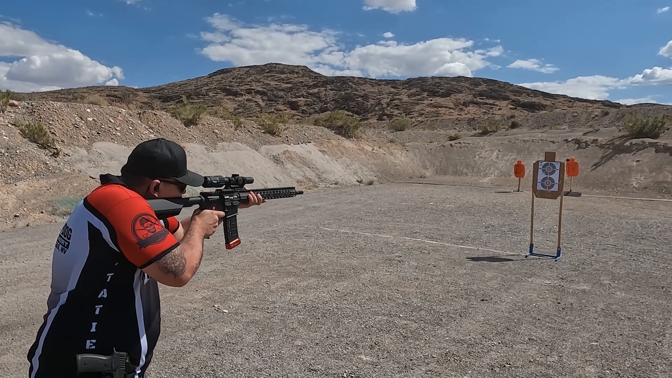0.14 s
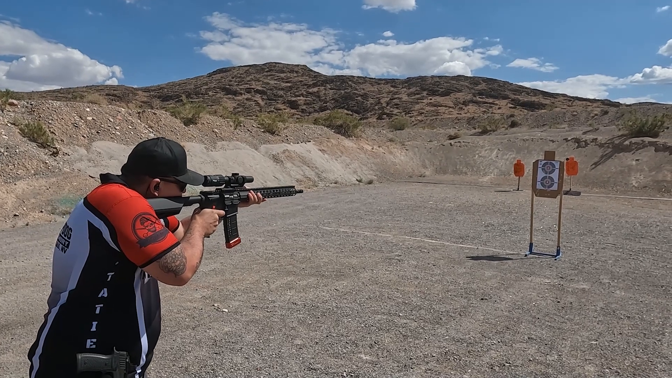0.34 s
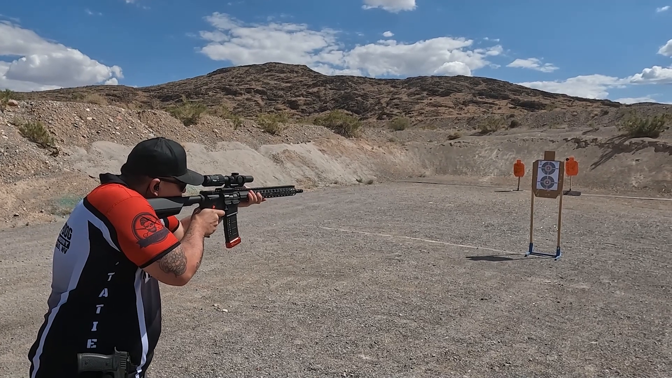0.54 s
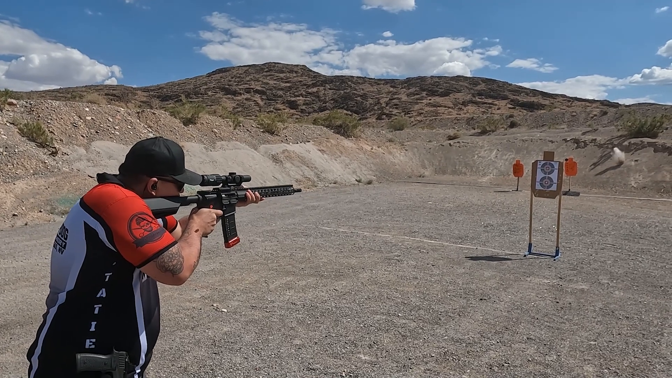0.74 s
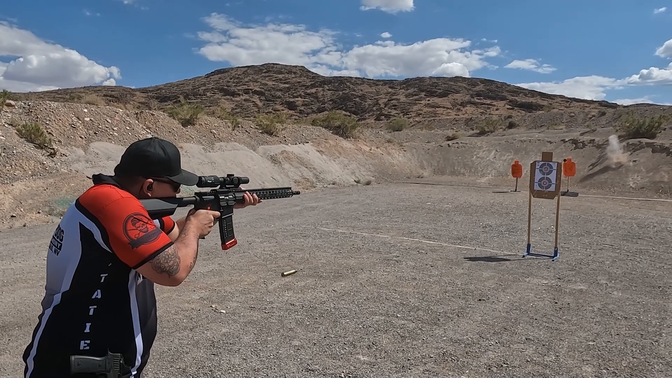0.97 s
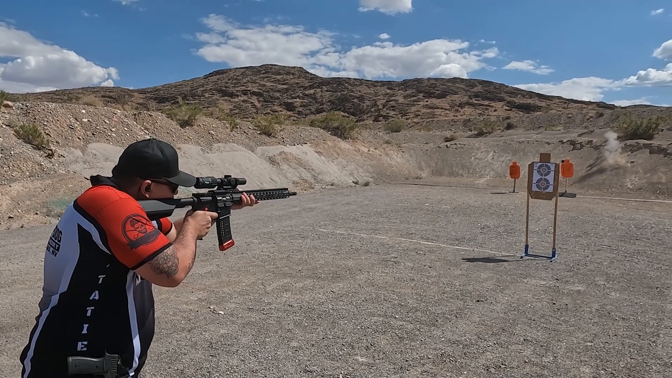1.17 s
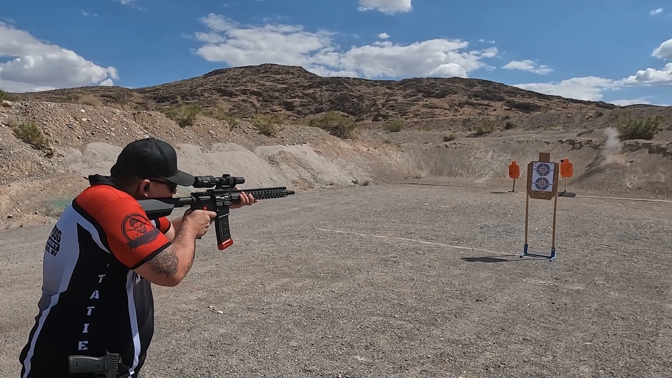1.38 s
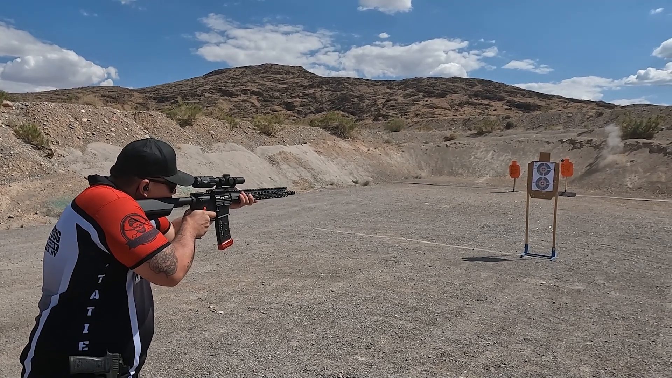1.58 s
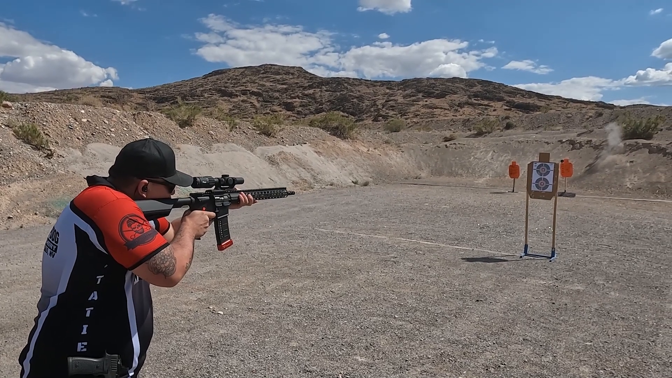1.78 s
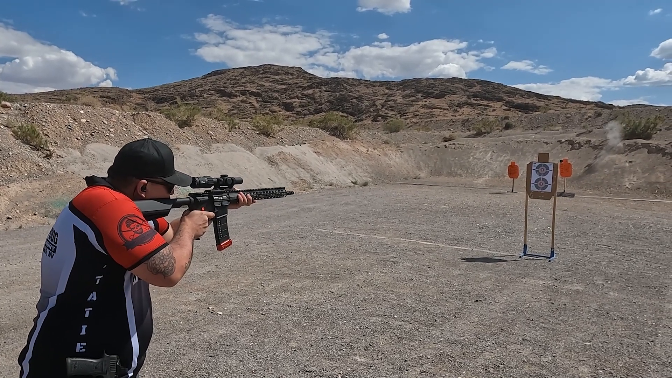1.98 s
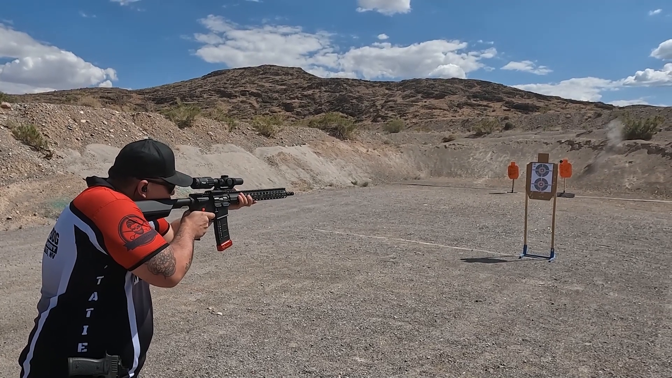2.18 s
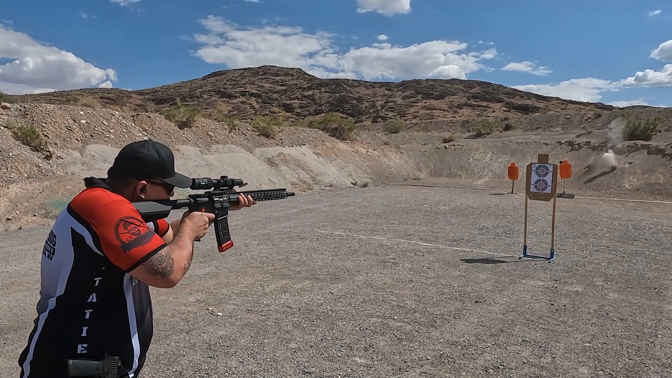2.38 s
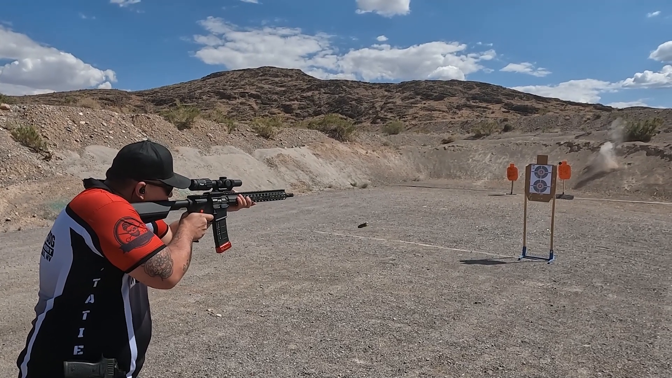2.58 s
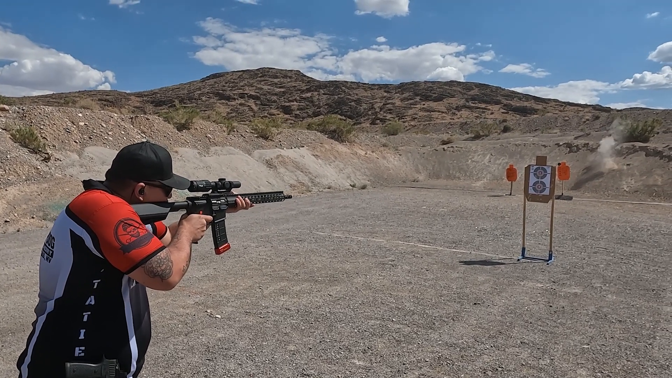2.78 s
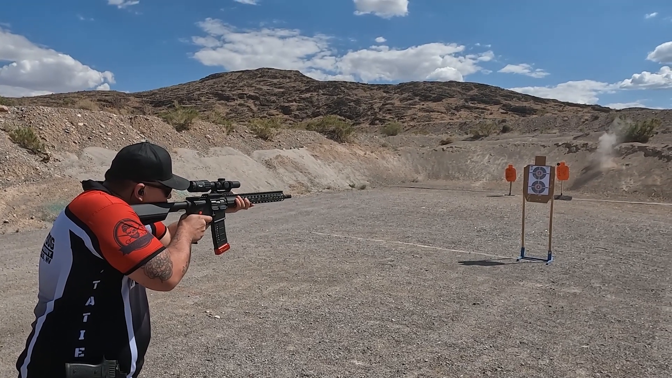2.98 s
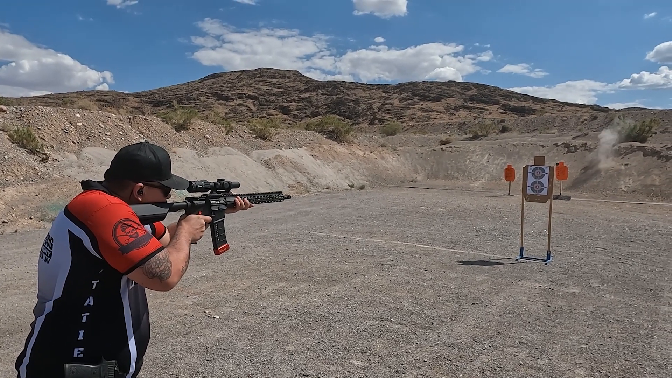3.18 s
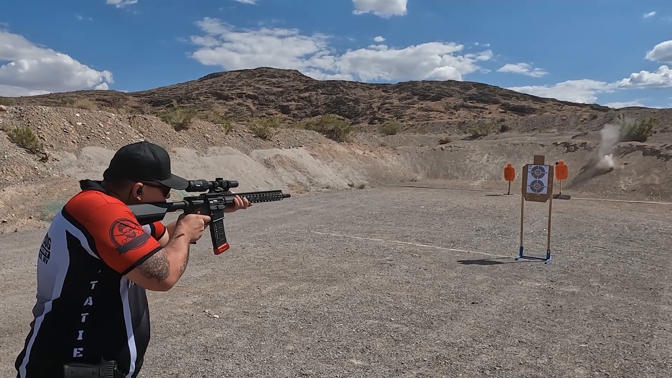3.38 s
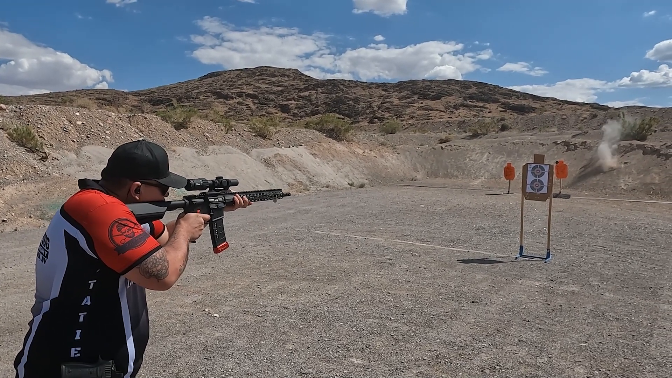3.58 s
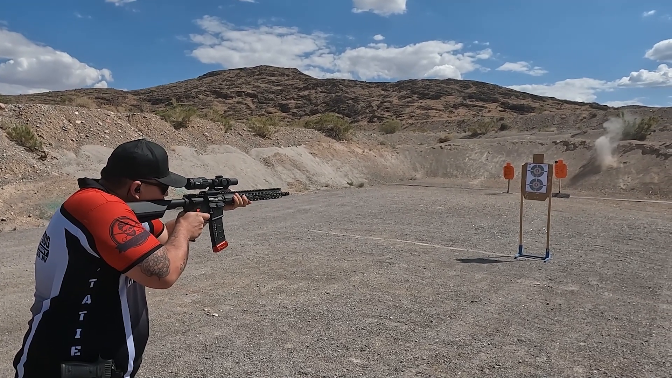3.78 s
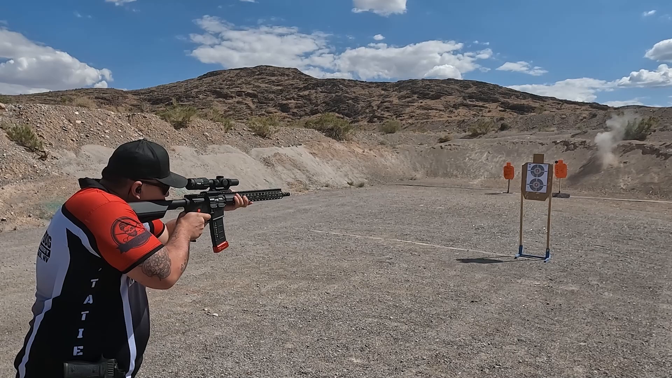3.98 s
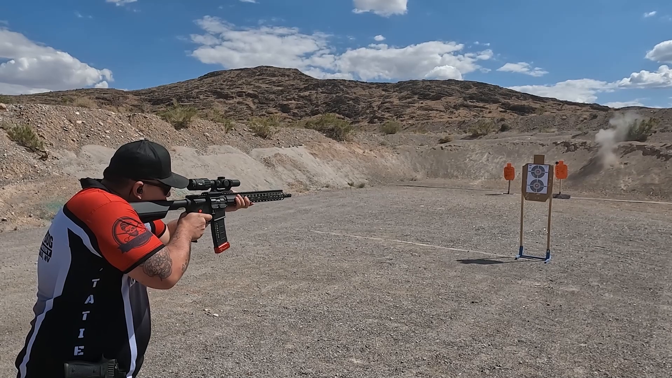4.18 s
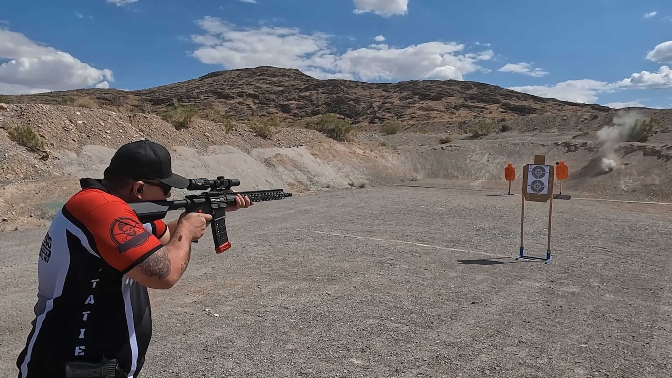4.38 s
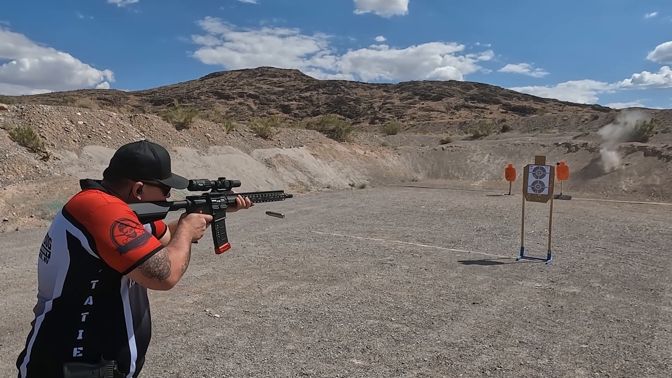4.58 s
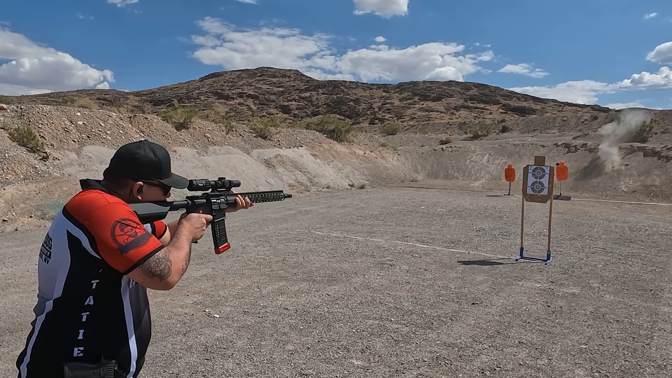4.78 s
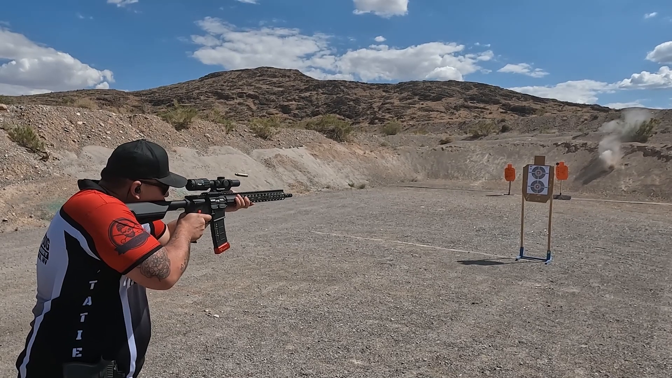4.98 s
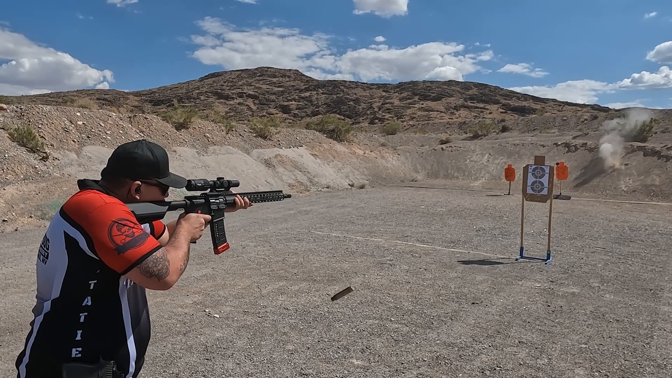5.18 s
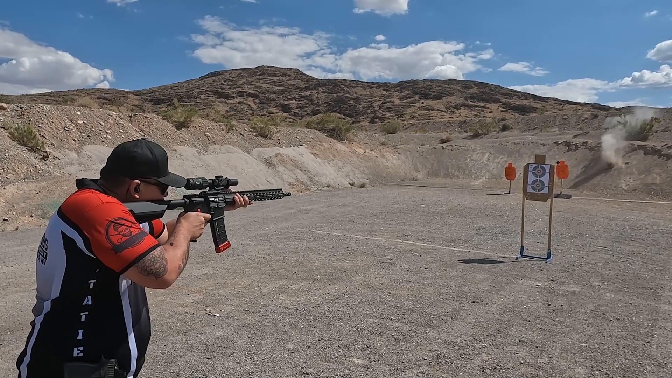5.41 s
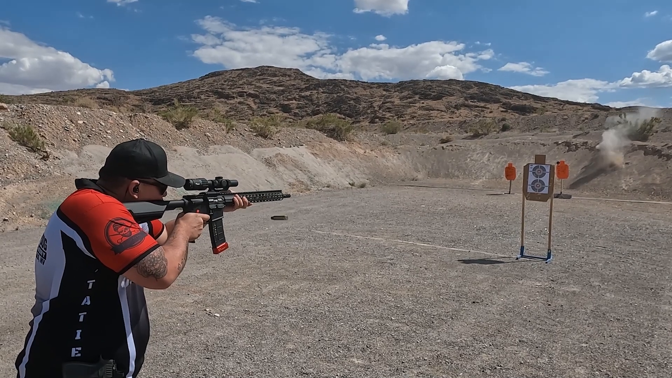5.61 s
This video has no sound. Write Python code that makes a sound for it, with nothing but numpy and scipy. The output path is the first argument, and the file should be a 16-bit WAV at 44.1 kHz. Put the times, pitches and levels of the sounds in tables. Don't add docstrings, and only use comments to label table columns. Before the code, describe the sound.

Six rifle shots, sharp and clipping the nearby microphone, with a metallic bolt clatter right behind each blast. Earth banks throw the sound back at once, a hill answers about half a second later, and low rumble trails away. A dry trigger clack follows every shot; ejected cases land on gravel with thin high rings. Light wind rumbles underneath, and the shots bunch up towards the end.

```python
import sys
import numpy as np
from scipy import signal
from scipy.fft import rfft, irfft
from scipy.io import wavfile
from scipy.ndimage import uniform_filter1d, minimum_filter1d

SR = 44100
rng = np.random.default_rng(int(sys.argv[2]) if len(sys.argv) > 2 else 0)


def convert_level_to_amplitude(level_db):
    exponent = np.asarray(level_db, float) / 20
    return 10 ** exponent


def unload_wav(signal):
    wavfile.write(
        sys.argv[1],
        SR,
        np.round(np.clip(np.atleast_2d(signal).T, -1, 1) * 32767).astype(np.int16),
    )


N = 249120

# start_s, blast_db, bolt_closes_after_s, capsule_swing_s, sizzle_db
SHOTS = [
    (0.787, -0.66, .100, 0.057, 2),
    (2.3960, -0.84, 0.083, 0.049, 7),
    (3.4256, -0.65, 0.096, 0.05, 6),
    (4.4200, -0.6, 0.081, 0.053, 2),
    (4.9339, -1.05, .085, 0.042, 5.5),
    (5.4344, -1.54, 0.072, 0.03, 2.5),
]


def rifle():
    layers = [near_boom(), near_crack(), muzzle(), hill_boom(), hill_crack(), pit(), slopes(), hollow()]
    out, thuds = np.zeros(N), faces()
    for k, (s, blast_db, bolt_s, swing_s, sizzle_db) in enumerate(SHOTS):
        for sound in [layer[k] for layer in layers] + [thuds, convert_level_to_amplitude(sizzle_db) * sizzle()]:
            add(out, convert_level_to_amplitude(blast_db) * dulled(sound), s)
        add(out, hammer(), s)
        add(out, convert_level_to_amplitude(-7.5) * burst(.003, .01, 7000, 10500), s + .0075)
        add(out, convert_level_to_amplitude(-11.5) * burst(.0014, .13, 6000, 12000), s + .0145)
        add(out, convert_level_to_amplitude(-15) * burst(.0042, .074, 4000, 10000), s + bolt_s)
        add(out, membrane(.012, level_db=-14, turns=.62), s + .009)
        add(out, membrane(swing_s, level_db=-6.5, turns=1.52), s + .0335)
    return out


def hammer():
    out = np.zeros(SR // 2)
    add(out, convert_level_to_amplitude(-23) * burst(.0011, .0083, 900, 12000), 0)
    add(out, convert_level_to_amplitude(-16) * struck([(1490, .5, .011), (900, -12.5, .03)], [.0002], spread_db=1), 0)
    return out


# after_shot_s, holds_until_after_s, boom_db, crack_db, fade_db_per_s
NEAR = [(.0056, 0.0072, -11.5, -15, 5000), (.0148, .0102, -5, -13, 237.5), (.05, 0.043, -11.5, -18.5, 380),
        (.1, 0.058, -21.5, -28, 240.5), (.2, .04, -45, -43, 450), (.3, .3, -51, -99, 200)]
# pitch_hz, level_db (per Hz)
BOOM = [(40, -11), (110, -4), (215, -8), (270, -3), (640, -7), (1000, -9.5), (1800, -19), (4000, -45)]


def near_boom():
    return returns(NEAR, SR * 3 // 5, 2, BOOM, fresh=.072, uneven_db=1.5,
                   rise_db_per_s=4300.5, late_s=.0055)


# pitch_hz, level_db (per Hz)
CRACK = [(600, -17.5), (1500, 1.5), (3000, 0), (5500, -6.5), (9000, -14), (12500, -22), (16000, -31)]


def near_crack():
    return returns(NEAR, SR * 3 // 5, 3, CRACK, fresh=.78, uneven_db=5, rise_db_per_s=35000)


# after_shot_s, holds_until_after_s, level_db, fade_db_per_s
MUZZLE = [
    (.006, .004, -14.5, 1500),
    (.0148, 0.019, -15.5, 297.5),
]
# pitch_hz, level_db (per Hz)
MUZZLE_TONE = [(300, -29), (550, -3), (850, -1), (1300, -2.5), (1900, -7.5), (3000, -29)]


def muzzle():
    return returns(MUZZLE, SR // 4, 2, MUZZLE_TONE, fresh=.34, uneven_db=2.5, rise_db_per_s=19998.5)


# after_shot_s, peak_db, pitch_hz, t60_s
FACES = [(.042, -5, 275, .045), (0.124, -18, 46.1, 0.14), (0.1285, -3, 513, 0.014),
         (0.1319, 2, 396, 0.0086), (.1345, -1.5, 426, .009), (0.1736, -11, 300, 0.037),
         (.191, -21.5, 614, 0.0463), (0.205, -15.5, 245.8, 0.047), (.262, -31.5, 103.4, 0.1),
         (.368, -34.5, 613, 0.04), (.3685, -47, 950, 0.022), (.383, -34, 535, 0.036)]


def faces():
    out = np.zeros(SR // 2)
    for s, peak_db, hz, t60 in FACES:
        add(out, -convert_level_to_amplitude(peak_db) * ring(np.eye(1, SR // 8)[0], hz, t60), s)
    return out


# after_shot_s, holds_until_after_s, level_db, fade_db_per_s
SIZZLE = [(.128, .03, -35, 110)]
# pitch_hz, width_hz, level_db
SIZZLE_PEAKS = [(6860, 580, 1.5), (8700, 350, -1.5), (10000, 960, -1), (13000, 2500, -14)]


def sizzle():
    t = np.arange(SR // 3) / SR
    noise = coloured(rng.standard_normal(len(t)), [(2000, 1.5), (6000, -5), (11000, 3), (16000, -17.5)])
    peaks = sum(convert_level_to_amplitude(level_db) * rms_one(ring(noise, hz, 1.2 / width)) for hz, width, level_db in SIZZLE_PEAKS)
    level_db = arrivals(t, SIZZLE, column=2, rise_db_per_s=500)
    stop_db = 580 * np.maximum(t - .23, 0)
    return rms_one(peaks) * convert_level_to_amplitude(level_db - stop_db)


def membrane(swing_s, level_db, turns):
    t = np.arange(SR // 2) / SR
    swing = np.sin(2 * np.pi * turns * (1 - np.exp(-t / swing_s)))
    return convert_level_to_amplitude(level_db) * np.tanh(1.8 * swing) * np.exp(-t / .065)


# after_shot_s, holds_until_after_s, boom_db, crack_db, fade_db_per_s
HILL = [
    (.376, .002, -48, -57, 300),
    (.438, 0.0093, -31.5, -40, 281),
    (.475, 0.078, -48, -50, 250),
    (.6, 0.011, -55.5, -62.5, 23),
]
# pitch_hz, level_db (per Hz)
HILL_TONE = [(150, -34), (350, -15), (420, 3.5), (780, 5), (930, 3.5), (1150, -9.5), (2000, -24.5),
             (4000, -74)]


def hill_boom():
    return returns(HILL, SR * 4 // 5, 2, HILL_TONE, fresh=.06, uneven_db=4.5, rise_db_per_s=240)


# pitch_hz, level_db (per Hz)
HILL_CRACK = [(500, -26), (1200, 7.5), (2500, -1.5), (4500, -14), (7000, -24.5), (10000, -37), (14000, -57)]


def hill_crack():
    return returns(HILL, SR * 4 // 5, 3, HILL_CRACK, fresh=1, uneven_db=3,
                   rise_db_per_s=404, loss_db_per_s=47)


# after_shot_s, holds_until_after_s, level_db, fade_db_per_s
PIT = [(.22, .005, -34, 45), (.85, 0.092, -65.5, 16)]
# pitch_hz, level_db (per Hz)
RUMBLE_TONE = [(40, -9.5), (90, -1), (150, 0.5), (230, -3.5), (350, -17), (700, -20.5), (2000, -63)]


def pit():
    return returns(PIT, SR * 8 // 5, 2, RUMBLE_TONE, fresh=.1, uneven_db=1.5, rise_db_per_s=349)


# after_shot_s, holds_until_after_s, level_db, fade_db_per_s
SLOPES = [(.35, 0.46, -60, 30), (.92, 0.28, -53, 110)]
# pitch_hz, level_db (per Hz)
SLOPE_TONE = [(60, -12), (130, -5), (230, -0.5), (500, -7), (1000, -13.5), (2200, -21), (4000, -32),
              (8000, -57)]


def slopes():
    sounds = returns(SLOPES, SR * 8 // 5, 2, SLOPE_TONE, fresh=.23, uneven_db=5, rise_db_per_s=43.5)
    return [convert_level_to_amplitude(2 * k) * sound for k, sound in enumerate(sounds)]


# after_shot_s, holds_until_after_s, level_db, fade_db_per_s
HOLLOW = [(1.38, .14, -64.5, 55)]
# pitch_hz, level_db (per Hz)
HOLLOW_TONE = [(245, -28.5), (270, -1.5), (280, -12.5), (294, 16), (315, -37.5)]


def hollow():
    return returns(HOLLOW, SR * 81 // 50, 2, HOLLOW_TONE, fresh=.1, uneven_db=6, rise_db_per_s=57.5)


# start_s, peak_db
RESETS = [(1.0500, -8), (2.673, -7), (3.7274, -7), (4.5914, -12), (5.1067, -12), (5.6072, -14)]
# pitch_hz, level_db, t60_s
RECEIVER = [(110, -27, 0.026), (1250, -9, 0.02), (1652, 0.5, 0.007), (2130, -2, 0.01), (2600, -9.5, 0.013),
            (3550, 2, 0.0069), (7600, -8.5, 0.012), (10080, -10, 0.011)]
# pitch_hz, level_db, t60_s
HOUSING_RING = [(1292, -45, .14), (3413, -37, .16), (9350, -38, .15)]


def trigger():
    out = np.zeros(N)
    for s, peak_db in RESETS:
        clack = struck(RECEIVER + HOUSING_RING, [0, .0007, .0017, .0028], spread_db=4.5)
        stock = struck([(628, 0, .016)], [0], spread_db=.3)
        add(out, convert_level_to_amplitude(peak_db - 13) * clack, s + .00064)
        add(out, convert_level_to_amplitude(peak_db - 8.5) * stock, s + .00339)
        add(out, convert_level_to_amplitude(peak_db - 7.5) * burst(.0014, .005, 1200, 10800), s + .0008)
        add(out, convert_level_to_amplitude(peak_db - 22) * burst(.001, .006, 8000, 8600), s + .0076)
        add(out, convert_level_to_amplitude(peak_db - 29) * burst(.0071, .041, 400, 6800), s + .004)
        add(out, convert_level_to_amplitude(peak_db - 59) * burst(.12, .35, 7500, 10800), s + .004)
    return out


# start_s, knock_db, ring_db, pitch_hz
CASES = [(1.506, -36, -45.5, 11430), (1.512, -37, -64, 11450), (2.03, -66, -73, 11550),
         (3.1383, -40.5, -47, 10470), (3.1452, -34.5, -61, 14700), (3.148, -70, -57, 15220),
         (3.995, -47.5, -73.5, 8300), (4.192, -45, -53, 10770), (4.2, -45, -67.5, 15200),
         (4.372, -56, -54.5, 10820), (5.301, -48.5, -75, 7600), (5.33, -65, -72, 10560)]
# start_s, knock_db
SKIPS = [(1.618, -55), (1.685, -57), (1.742, -60.5), (1.8, -55), (1.85, -48), (1.993, -56)]
# pitch_hz, level_db, t60_s
STONE = [(1210, 3, 0.0091), (2220, -3.5, 0.0062), (3580, 0.5, 0.0027), (5300, -6, .006), (7200, -2, .007),
         (10000, -11, .008)]


def brass():
    out, tap = np.zeros(N), np.eye(1, SR // 2)[0]
    t = np.arange(len(tap)) / SR
    skips = [(s, knock_db, -79, CASES[0][-1]) for s, knock_db in SKIPS]
    for s, knock_db, ring_db, hz in CASES + skips:
        add(out, convert_level_to_amplitude(knock_db - 9) * struck(STONE, [0, .0009], spread_db=2), s)
        add(out, convert_level_to_amplitude(knock_db - 6.5) * burst(.0014, .02, 500, 10000), s)
        tumble = convert_level_to_amplitude(4 * np.sin(2 * np.pi * (17 * t + rng.random())))
        beating = ring(tap, hz, .16) + .5 * ring(tap, hz + 60, .16)
        add(out, convert_level_to_amplitude(ring_db) * tumble * beating, s + .001)
    return out


# start_s, end_s, pitch_hz, end_pitch_hz, level_db
SPIN = (3.36, 3.5, 7897.5, 8397.5, -52.5)


def whistle():
    s, end_s, hz, end_hz, level_db = SPIN
    part = np.linspace(0, 1, int((end_s - s) * SR))
    waver = uniform_filter1d(rng.standard_normal(len(part)), size=200)
    phase = 2 * np.pi * np.cumsum(hz + (end_hz - hz) * part + 600 * waver) / SR
    tone = np.sin(phase) + convert_level_to_amplitude(-3) * np.sin(1.295 * phase)
    out = np.zeros(N)
    add(out, convert_level_to_amplitude(level_db) * part ** 1.5 * tone, s)
    return out


# start_s, peak_db, low_hz, high_hz
RUSTLES = [(.004, -48.5, 150, 900), (.033, -58, 150, 3000), (.09, -54, 200, 900), (.235, -58, 200, 700),
           (.455, -62, 700, 1300), (0.464, -64, 150, 2800), (0.467, -47.5, 120, 597),
           (.481, -60, 150, 2800), (.655, -64, 2000, 4000), (.735, -62, 201, 3300)]


def rustles():
    out = np.zeros(N)
    for s, peak_db, low_hz, high_hz in RUSTLES:
        add(out, convert_level_to_amplitude(peak_db) * burst(.0053, .05, low_hz, high_hz), s)
    return out


# start_s, peak_db
GUSTS = [(0, -38.5), (.35, -44.5), (1.1, -40.5), (1.95, -43), (2.45, -42), (3.3, -45), (4.3, -34),
         (5.3, -39)]
# pitch_hz, level_db (per Hz)
AIR = [(12, -23.5), (20, 3.5), (81, -26.5), (127, -22.5), (163, -47), (285, -31.5), (3630, -57),
       (16000, -62.5)]


def outdoors():
    lumps = signal.lfilter([1], [1, -1.9976, .9976015], rng.standard_normal(N + SR))[SR:]
    rows = [(s, 0, peak_db, 42) for s, peak_db in GUSTS]
    gust_db = arrivals(np.arange(N) / SR, rows, column=2, rise_db_per_s=35.5)
    rumble = coloured(rng.standard_normal(N), [(12, -4.5), (28, 1), (70, -12), (200, -20.5), (500, -61.5)])
    wind = convert_level_to_amplitude(gust_db - 10 + rms_one(lumps)) * rumble
    return wind + convert_level_to_amplitude(-48.5) * coloured(rng.standard_normal(N), AIR)


# pitch_hz, level_db (per Hz)
MISMATCH = [(150, -14), (500, -7), (1200, -17), (2500, -10), (5000, -3), (9000, 4), (12000, -1.5),
            (14000, -29)]


def channel_difference(loud):
    treble = signal.sosfilt(signal.butter(2, 3000, "high", fs=SR, output="sos"), loud)
    follow = np.sqrt(np.abs(uniform_filter1d(treble ** 2, size=1400)))
    follow = minimum_filter1d(follow, size=1600, origin=700)
    noise = coloured(rng.standard_normal(N), MISMATCH) * np.maximum(follow - .004, 0)
    cells = signal.stft(noise, nperseg=2048)[2]
    patches = np.repeat(rng.random((33, cells.shape[1])) < .45, 32, axis=0)[:len(cells)]
    return convert_level_to_amplitude(-17) * signal.istft(cells * patches, nperseg=2048)[1][:N]


def returns(rows, count, column, spectrum, fresh, uneven_db, **swell):
    shape = convert_level_to_amplitude(arrivals(np.arange(count) / SR, rows, column, **swell))
    lasting = scatterers(count, uneven_db)
    sounds = []
    for shot in SHOTS:
        mix = np.sqrt(1 - fresh) * lasting + np.sqrt(fresh) * scatterers(count, uneven_db)
        sounds.append(shape * coloured(mix, spectrum))
    return sounds


def scatterers(size, uneven_db):
    return rng.standard_normal(size) * convert_level_to_amplitude(uneven_db * np.minimum(rng.exponential(1, size), 5))


def arrivals(t, rows, column, rise_db_per_s, late_s=0, loss_db_per_s=0):
    levels = []
    for row in rows:
        s, end_s = row[0] + late_s, row[0] + max(row[1], late_s)
        fade = (row[-1] + loss_db_per_s) * np.maximum(t - end_s, 0)
        levels.append(row[column] - rise_db_per_s * np.maximum(s - t, 0) - fade)
    return np.max(levels, axis=0)


def dulled(x):
    low = signal.sosfiltfilt(signal.cheby2(10, 30, 15500, fs=SR, output="sos"), x)
    share = np.clip((np.arange(len(x)) / SR - .05) / .08, 0, 1)
    return x + share * (low - x)


def struck(modes, taps_s, spread_db):
    out = 0
    for hz, level_db, t60 in modes:
        clicks = np.zeros(SR // 4)
        strength_db = level_db + spread_db * rng.standard_normal(len(taps_s))
        clicks[(np.array(taps_s) * SR).astype(int)] = -convert_level_to_amplitude(strength_db)
        out = out + ring(clicks, hz, t60)
    return out


def ring(clicks, hz, t60):
    r, w = convert_level_to_amplitude(-60 / (t60 * SR)), 2 * np.pi * hz / SR
    return signal.lfilter([0, np.sin(w)], [1, -2 * r * np.cos(w), r * r], clicks + 1e-18)


def burst(length_s, t60, low_hz, high_hz):
    t = np.arange(SR // 3) / SR
    band = signal.butter(2, [low_hz, min(high_hz, SR * .45)], "band", fs=SR, output="sos")
    noise = rms_one(signal.sosfilt(band, rng.standard_normal(len(t))))
    return .53 * noise * convert_level_to_amplitude(-60 * np.maximum(t - length_s, 0) / t60)


def coloured(x, spectrum):
    hz, level_db = np.transpose(spectrum)
    bins = np.fft.rfftfreq(len(x), 1 / SR) + 1
    gain = convert_level_to_amplitude(np.interp(np.log(bins), np.log(hz), level_db))
    return rms_one(irfft(rfft(x) * gain, len(x)))


def rms_one(x):
    return x / np.sqrt(np.mean(x ** 2) + 1e-20)


def add(out, sound, s):
    i = int(round(s * SR))
    out[i:i + len(sound)] += sound[:len(out) - i]


def scene():
    return np.tile(rifle() + trigger() + brass() + whistle() + rustles() + outdoors(), (2, 1))


def top_cut(x):
    return signal.sosfilt(signal.butter(12, 16650, fs=SR, output="sos"), x)


def record(dry):
    loud = np.tanh(dry / 1.065)
    hiss = coloured(rng.standard_normal(2 * N), [(100, 5.5), (2000, 1.5), (16000, -5.5)]).reshape(2, N)
    mixed = loud + channel_difference(loud[0]) * [[1], [-1]] + convert_level_to_amplitude(-71) * hiss
    top = signal.cheby2(10, 50, 15900 * 1.025, fs=SR, output="sos")
    return top_cut(signal.sosfilt(top, mixed))


dry = scene()
out = record(dry)
unload_wav(out)
```